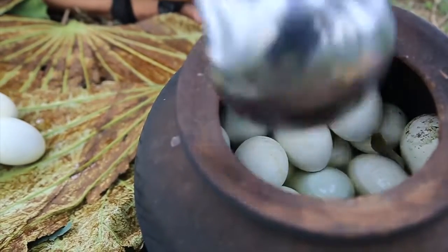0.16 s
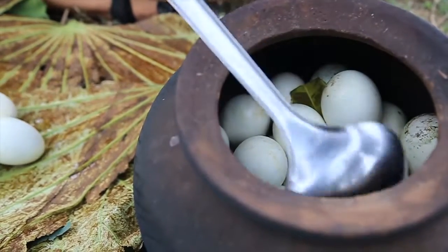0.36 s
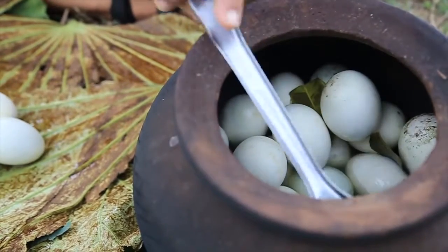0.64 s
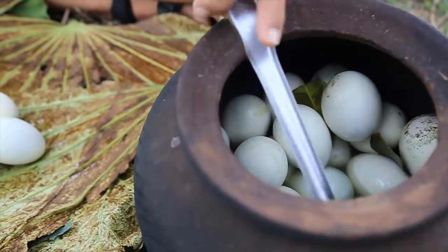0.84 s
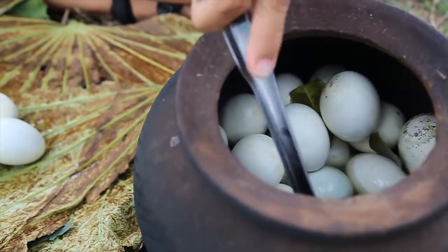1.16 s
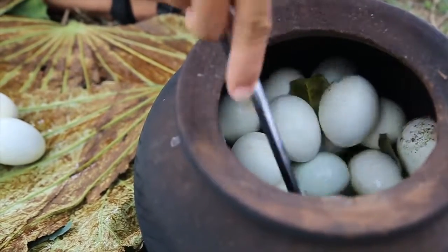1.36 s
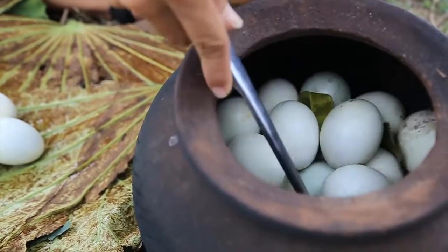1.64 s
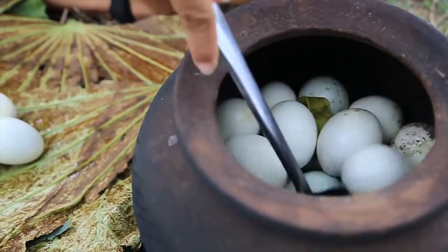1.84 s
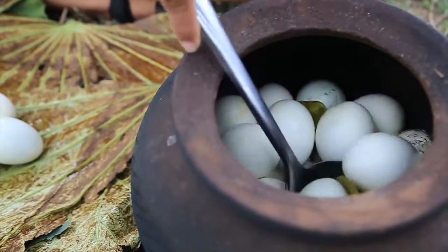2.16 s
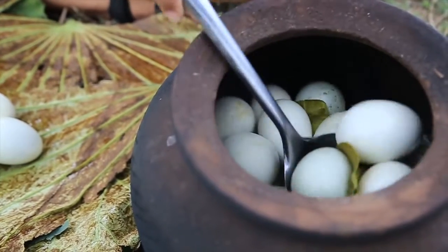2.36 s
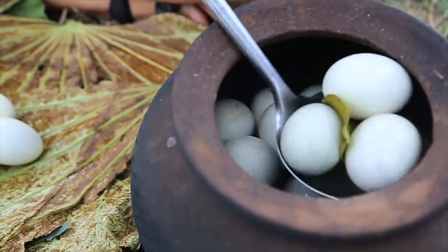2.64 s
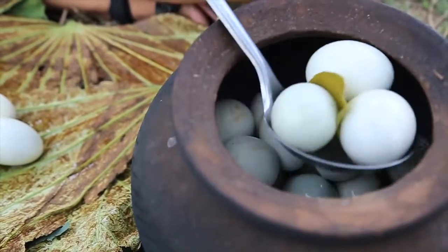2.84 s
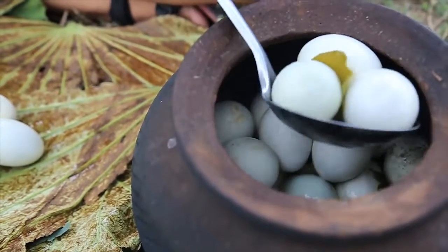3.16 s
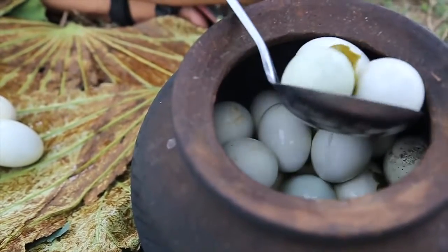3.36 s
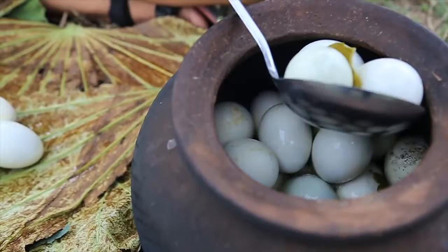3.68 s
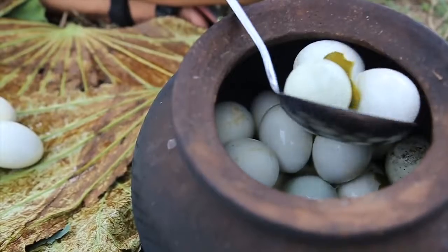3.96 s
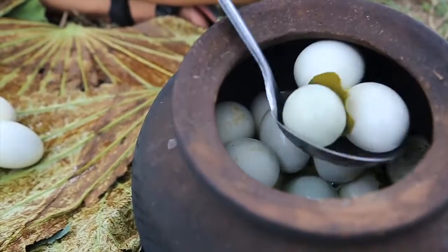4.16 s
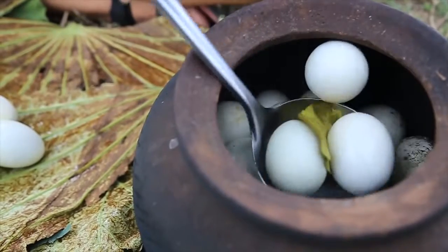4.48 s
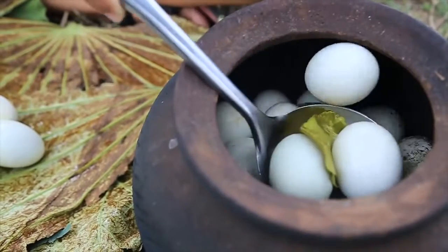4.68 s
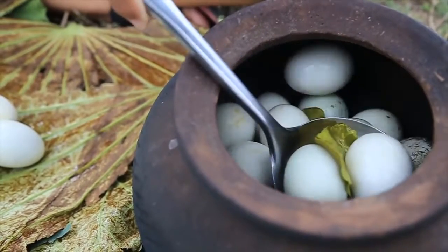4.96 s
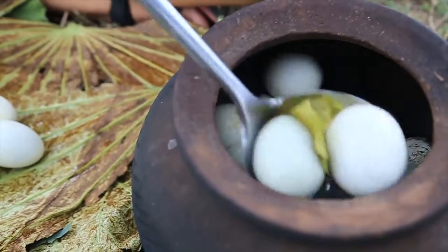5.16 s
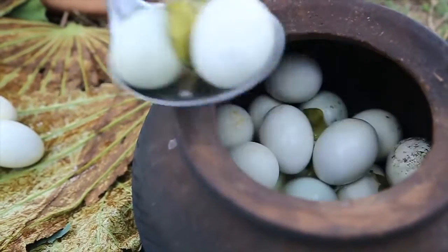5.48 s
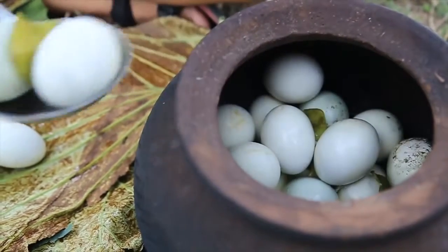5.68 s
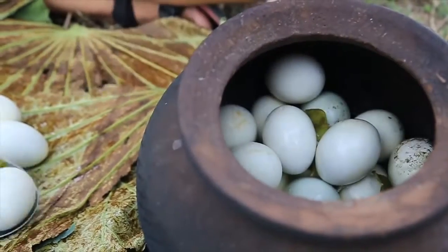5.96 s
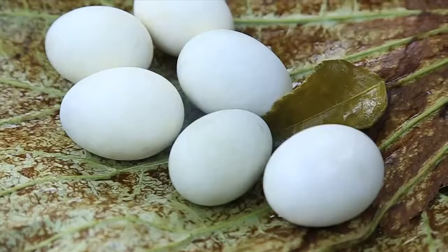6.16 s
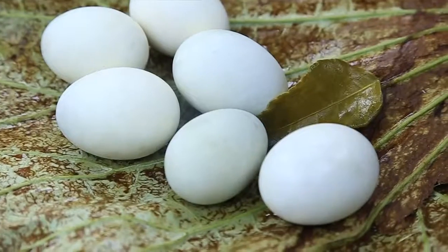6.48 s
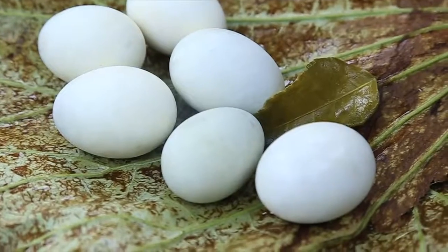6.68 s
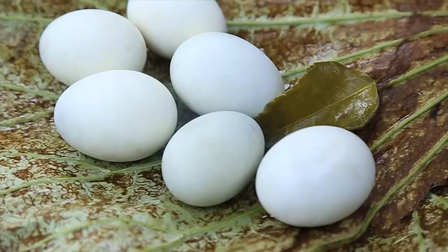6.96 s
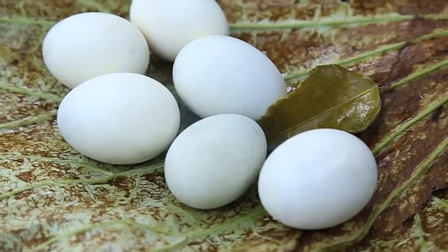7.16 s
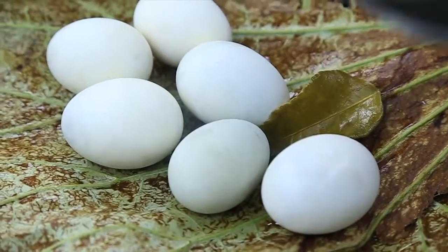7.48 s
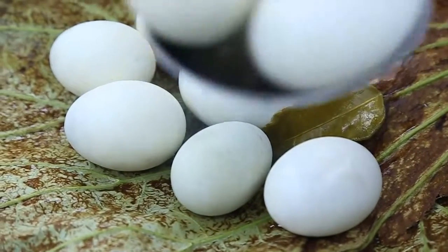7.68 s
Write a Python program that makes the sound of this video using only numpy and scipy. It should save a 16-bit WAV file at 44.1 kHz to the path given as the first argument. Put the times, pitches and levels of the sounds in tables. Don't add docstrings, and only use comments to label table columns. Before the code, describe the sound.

Low uneven wind buffeting runs nearly throughout, with a thin steady hiss. Near the microphone, a metal ladle clacks on thick clay and rattles among eggs: dry knocks, gritty scrapes, tiny squeaks and a hollow pot resonance. The hardest early blows come in the first two seconds, a quiet lift follows, then a tight burst of knocks around five seconds. After a momentary dropout, small taps and a squeak give way to wind.

```python
import sys
import numpy as np
from scipy import signal
from scipy.fft import rfft, irfft
from scipy.io import wavfile
from scipy.ndimage import uniform_filter1d

SR = 44100
rng = np.random.default_rng(int(sys.argv[2]) if len(sys.argv) > 2 else 0)


def invert_db(level):
    return 10 ** (np.asarray(level, dtype=float) / 20)


def master_out(mix):
    frames = np.transpose(np.atleast_2d(mix))
    ceiling = np.clip(frames, -1, 1)
    pcm = np.round(ceiling * 32767).astype(np.int16)
    wavfile.write(sys.argv[1], SR, pcm)


N = 345303


def band(x, low_hz, high_hz, order=2):
    return signal.sosfilt(signal.butter(order, [low_hz, high_hz], "band", fs=SR, output="sos"), x)


def rms_one(x):
    return x / np.sqrt(np.mean(x ** 2) + 1e-20)


def in_time(table):
    start_s, *columns = np.transpose(table)
    return [np.interp(np.arange(N) / SR, start_s, column) for column in columns]


def drift(rate_hz):
    r = np.exp(-80 * np.pi * rate_hz / SR)
    white = rng.standard_normal(N // 40 + 2002)
    slow = rms_one(signal.lfilter([1], [1, -2 * r, r * r], white)[2000:])
    return np.interp(np.arange(N) / 40, np.arange(len(slow)), slow)


def ring(x, hz, t60_s):
    r, w = invert_db(-60 / (t60_s * SR)), 2 * np.pi * hz / SR
    return signal.lfilter([0, np.sin(w)], [1, -2 * r * np.cos(w), r * r], x + 1e-18)


def evened(x, span_s, share):
    swell = uniform_filter1d(x ** 2, max(int(span_s * SR), 1)) + 1e-12
    return rms_one(x / swell ** (share / 2))


# peak_s, peak_db, dying_s
GUSTS = [(.03, -33.5, 1), (.81, -25.5, 0.069), (1.3, -26, 0.046), (1.74, -30, 0.015), (2.5, -29, 0.045),
         (2.722, -17, 0.019), (3.28, -31, 0.1), (3.55, -28.5, 0.061), (3.72, -18, 0.066),
         (4.05, -17, 0.029), (4.52, -25, 0.045), (5.13, -19.5, 0.032), (5.52, -29.5, 0.044),
         (5.73, -22, 0.26), (5.99, -38.5, 0.11), (6.31, -31, 0.016), (6.55, -35, 0.094),
         (7.32, -22.5, 0.094), (7.72, -31.5, 0.092)]


def gusts():
    t, rise_s = np.arange(N) / SR, 0.015
    return sum(invert_db(peak_db) * np.exp(np.minimum((t - s) / rise_s, (s - t) / dying_s))
               for s, peak_db, dying_s in GUSTS)


# start_s, strength_db, tilt_db (from slow buffeting to flutter)
WIND = [(0, -30, 12.5), (.36, -17.5, 1), (.48, -28.5, -9), (.9, -20, -1), (1.1, -27, -5.5), (1.55, -27, -5),
        (1.68, -15, 1), (2.9, -17.5, -1.5), (3.07, -24, -4), (3.76, -15, -0.5), (4.48, -12.5, -.5),
        (4.92, -18.5, -2.5), (5.42, -29.5, -10.5), (5.55, -19, -1), (6.2, -15.5, -2), (6.85, -21, -0.5),
        (7.39, -18, -0.5), (7.83, -14.5, 3)]


def wind():
    wind_db, tilt_db = in_time(WIND)
    white = rng.standard_normal((3, N + SR))
    slow = evened(band(white[0], 20.9, 58.5)[SR:], 0.13, 0.29)
    flutter = evened(band(white[1], 64.7, 114.2, order=3)[SR:], 0.088, 0.3)
    small = band(band(white[2], 146.6, 179.0, order=1), 115, 327)[SR:]
    small = evened(small, 0.039, 0.77) * invert_db(2.0 * drift(23))
    burst = gusts()
    slow_gain = invert_db(wind_db - 4.5 - tilt_db)
    flutter_gain = invert_db(wind_db - 8 + tilt_db) + invert_db(4.5) * burst
    small_gain = invert_db(wind_db + tilt_db - 22) + invert_db(-5.0) * burst
    return slow_gain * slow + flutter_gain * flutter + small_gain * small


# pitch_hz, level_db (per Hz)
HISS_COLOUR = [(150, -56), (250, -13.5), (600, -12), (2000, -16.5), (9300, -27), (10200, -31),
               (15600, -33.5), (16000, -61)]
# start_s, level_db
HISS_LEVEL = [(0.0, -39), (1.28, -40), (2.14, -38.5), (4.21, -40), (7.83, -44)]


def hiss():
    hz = np.fft.rfftfreq(N, 1 / SR)[1:]
    points = np.array(HISS_COLOUR)
    shape = invert_db(np.interp(np.log(hz), np.log(points[:, 0]), points[:, 1]))
    noise = rms_one(irfft(rfft(rng.standard_normal(N)) * np.append(0, shape), N))
    whine_hz, whine_db = 15661, -70
    whine_gain = invert_db(whine_db + 1.5 * drift(8)) * np.sqrt(2)
    whine = whine_gain * np.sin(2 * np.pi * whine_hz * np.arange(N) / SR + 0.8 * drift(5))
    return invert_db(in_time(HISS_LEVEL)[0] - 6.5 + 1.62 * drift(21.4)) * noise + whine


# pitch_hz, level_db, t60_s
POT_MODES = [(915, 4, 0.4), (1070, 1.5, 0.13), (1470, -24, 0.28), (1740, -2, 0.11), (2050, 4.5, 0.052),
             (2330, 15, 0.017), (2720, 11.5, 0.023), (3300, 2.5, 0.084), (3600, 1.5, 0.05),
             (4060, -2.5, 0.081), (5550, -30, .04)]


def walls(x, hz, damping, reach_db):
    return rms_one(sum(invert_db(db - reach_db * abs(np.log2(mode_hz / hz))) * ring(x, mode_hz, damping * t60_s)
                       for mode_hz, db, t60_s in POT_MODES))


def cavity(x, t60_s):
    full_hz, emptier_hz, lift_s = 376, 355.3, 2.7
    early = np.arange(N) < lift_s * SR
    return ring(x * early, full_hz, t60_s) + ring(x * ~early, emptier_hz, t60_s)


def blows(rows, sustain, wall_db, wide_db):
    out, low, bright = np.zeros(N), np.zeros(N), np.zeros((2, N))
    t = np.arange(2048) / SR
    rattle = np.tanh(1.03 * rng.standard_normal((len(rows), len(t))))
    snap_db, snap_t60_s = -2, 0.00098
    snap = invert_db(snap_db - 60 * t / snap_t60_s)
    for (s, peak_db, hz, crack_db, boom_db, t60_s), noise in zip(rows, rattle):
        t60_s = np.clip(t60_s, 0.003, 0.2)
        i = round(s * SR)
        part = slice(i, i + len(t))
        contact = noise * (invert_db(-60 * t / t60_s) + snap) * (1 - np.exp(-t / 0.00029))
        shell = rms_one(ring(contact, hz, sustain * t60_s))
        wide = rms_one(band(contact, 1130, 4200))
        body = shell + invert_db(wall_db) * walls(contact, hz, 0.57, reach_db=6.0) + invert_db(wide_db) * wide
        body = band(body, 450, max(4500, 6.3 * hz), order=1) * np.minimum(1, (t[-1] - t) / 0.04)
        out[part] += invert_db(peak_db) * body / np.abs(body).max()
        crack_gain = invert_db(peak_db + crack_db * np.array([[1], [1.2]]))
        bright[:, part] += crack_gain * contact / np.abs(contact).max()
        low[i] += invert_db(peak_db + boom_db)
    crack = invert_db(7.5) * band(bright[0], 2350, 8180) + invert_db(-0.5) * band(bright[1], 5400, 15500)
    thud = cavity(low, 0.099) + invert_db(1.0) * ring(low, 558, 0.012)
    return out + crack + invert_db(-4.0) * band(thud, 332, 1500)


# start_s, peak_db, pitch_hz, crack_db (re peak), contact_t60_s
CLACKS = [(0.458, -9.5, 1130, -34, 0.028), (0.697, -17.5, 810, -25, 0.0089), (0.98, -9.5, 2100, -7, 0.028),
          (1.018, -8.5, 2990, -8, 0.017), (1.168, -21, 1750, -15, 0.082), (1.244, -24, 1790, -16, 0.02),
          (1.351, -5, 2250, -20, 0.028), (2.026, -7, 2330, -10.5, 0.038), (2.205, -23, 2460, -9.5, 0.015),
          (2.983, -18.5, 1070, -15, 0.014), (3.396, -26.5, 2980, -25, 0.015), (3.65, -26, 965, -29, 0.069),
          (3.773, -22.5, 2420, -8, 0.021), (3.936, -24.5, 2180, -7, 0.019), (4.326, -21, 915, -15, 0.028),
          (5.172, -10.5, 830, -44, 0.016), (5.2, -19, 2050, -29, 0.014), (6.302, -25, 1900, -20, 0.012),
          (6.5576, -15, 1600, -14, 0.007), (6.608, -26, 2085, -18, 0.012)]


def clacks():
    rows = [(s, peak_db, hz, crack_db, -7.5 - 9.5 * np.log2(hz / 1000), t60_s)
            for s, peak_db, hz, crack_db, t60_s in CLACKS]
    return blows(rows, 1.76, wall_db=-3.0, wide_db=-6.5)


# start_s, blow_db, brightness_db (per octave)
CLINKS = [
    (0.459, -23.5, -0.5),
    (.484, -37.5, 3.5),
    (.67, -48, 8),
    (0.696, -31.5, 1),
]
# pitch_hz, level_db, t60_s
LADLE_MODES = [(1065, -24.5, 0.088), (1600, 1, 0.086), (1900, 4.5, 0.036), (2260, -1.5, 0.15),
               (4230, -13, 0.091), (5157, -9, 0.22), (5670, -14, .07), (7170, -12, .1), (8540, -8.5, .1),
               (9560, -14, .1), (10750, -17, .1), (12600, -9, 0.042), (14400, -12, .08), (15200, -20, .08)]


def clinks():
    out, at = np.zeros(N), [round(s * SR) for s, blow_db, tilt_db in CLINKS]
    strengths_db = rng.normal(0, 1.4, (len(CLINKS), len(LADLE_MODES)))
    for (hz, level_db, t60_s), own_db in zip(LADLE_MODES, strengths_db.T):
        clicks = np.zeros(N)
        struck_db = [blow_db + level_db + tilt_db * np.log2(hz / 3000) for s, blow_db, tilt_db in CLINKS]
        clicks[at] = invert_db(struck_db + own_db)
        out += ring(clicks, hz, min(t60_s, 0.3 if hz < 5400 else 0.08))
    return out


# start_s, pitch_hz, level_db, t60_s
RINGS = [(.486, 3623, -33, .6), (.466, 3623, -41, .15), (.98, 620, -27, .05), (.524, 1077, -33, .06),
         (.89, 960, -32, .15), (.89, 1510, -31, .12), (1.021, 1502, -28, .17), (.98, 1830, -9, .05),
         (.98, 1700, -16, .09), (.981, 2024, -20, .08), (.98, 5450, -22, .03), (1.018, 1725, -.5, .04),
         (1.0182, 1949, -9, .04), (1.018, 3526, -25, .05), (5.279, 1080, -15, .06), (5.288, 1061, -13, .07),
         (5.289, 684, -19, .1), (5.288, 1873, -17, .08), (6.5572, 2089, -16, .075), (.98, 372, -23, .1),
         (1.018, 366, -26, .2), (.982, 958, -31, .12), (2.41, 372, -27, .2), (5.341, 352, -11.5, .14),
         (1.527, 570, -19, .05), (6.607, 1050, -35, .12), (6.609, 3400, -41, .12), (6.607, 2085, -27, .1),
         (2.984, 560, -30, .04), (1.018, 2290, -14, .03), (1.168, 1450, -33, .25), (1.355, 915, -27.5, .22),
         (4.96, 2050, -34, .1), (4.96, 2700, -36, .08), (5.126, 942, -23, .09), (5.253, 960, -27, .11),
         (6.243, 1000, -34, .35), (6.5572, 2750, -19, .035), (6.563, 3600, -30, .02),
         (6.558, 1030, -24, .07), (6.557, 1520, -19, .035)]


def rings():
    out, t, touch = np.zeros(N), np.arange(SR // 3) / SR, drift(90)
    for s, hz, level_db, t60_s in RINGS:
        i = round(s * SR)
        tone = np.sin(2 * np.pi * hz * t) * (1 - np.exp(-t / 0.00056)) * invert_db(level_db - 60 * t / t60_s)
        own_touch = np.roll(touch, round(hz * 10))[i:][:len(t)]
        tone = tone * invert_db(4.5 * np.minimum(2 * t / t60_s, 1) * own_touch)
        out[i:i + len(t)] += tone * np.cos(np.pi / 2 * t / t[-1])
    return out


# pitch_hz, width_hz, level_db
GRIT_MODES = [(7200, 240, 10), (7800, 70, 14), (8870, 220, 24), (10600, 110, -14), (13000, 440, -32),
              (14000, 200, -13), (14500, 70, -8)]


def steel(x):
    peaks = sum(rms_one(ring(x, hz, 0.65 / width_hz)) * invert_db(db) for hz, width_hz, db in GRIT_MODES)
    return rms_one(band(x, 3000, 15800, order=1)) + invert_db(-9) * rms_one(peaks)


# start_s, length_s, rubbing_db, pitch_hz
ROLLS = [(0.473, 0.055, -43, 1120), (0.873, 0.025, -39, 1520), (1.374, 0.12, -45, 1740),
         (1.604, 0.11, -43.5, 1800), (1.869, 0.019, -39, 1190), (2.016, 0.031, -27, 2530),
         (2.199, 0.046, -46, 2270), (2.397, 0.082, -44, 960), (2.605, 0.054, -33.5, 1820),
         (4.325, 0.13, -48, 2030), (5.136, 0.05, -39, 2040), (5.198, 0.074, -43.5, 1930)]
# start_s, length_s, rubbing_db, pitch_hz, grit_db (re rubbing)
SCRAPES = [(0.585, 0.038, -44, 1500, -3.5), (0.964, 0.0049, -44, 1600, 9), (1.169, 0.065, -41, 2730, -4.5),
           (1.246, 0.085, -38, 2900, -4), (1.26, 0.053, -45, 3400, -18), (1.342, 0.009, -33, 2050, 0),
           (1.531, 0.018, -34, 1470, -14), (1.659, 0.079, -38, 2280, -9.5),
           (1.934, 0.051, -43.5, 2620, -5.5), (2.095, 0.015, -43.5, 2000, -4),
           (2.376, 0.03, -45, 3080, -13), (2.877, 0.078, -47.5, 2150, -6.5), (3.323, 0.079, -46.5, 3530, 3),
           (3.422, 0.076, -48.5, 3970, -11), (3.58, 0.069, -49.5, 3680, -0.5), (3.902, 0.095, -57, 2570, 6),
           (4.145, 0.14, -52, 3030, 3), (4.322, 0.2, -67, 3500, 6), (4.555, 0.049, -53, 3030, 4),
           (4.643, 0.055, -43.5, 1500, -6), (4.897, 0.036, -37, 1510, -17), (5.292, 0.034, -30, 2300, -5),
           (5.337, 0.023, -31.5, 2430, -13), (6.237, 0.04, -37.5, 2620, -3.5)]
# start_s, length_s, rubbing_db,
# pitch_hz, width_hz
SHELL_SLIDES = [(0.715, 0.05, -39.5, 1206, 50), (6.608, 0.035, -48, 1300, 900), (0.715, 0.06, -40, 1600, 550),
                (0.822, 0.064, -54, 3800, 900), (0.805, 0.1, -37.5, 2100, 570), (1.089, 0.036, -42.5, 2500, 900),
                (1.17, 0.025, -43, 2100, 70), (2.68, 0.071, -41.5, 1960, 200), (2.675, 0.1, -46, 2720, 180),
                (4.141, 0.16, -44, 2100, 400), (4.392, 0.12, -42, 2000, 300), (4.523, 0.093, -45.5, 2060, 300),
                (4.642, 0.09, -53, 14050, 400), (2.383, 0.038, -42.5, 1680, 150), (2.432, 0.045, -42, 780, 200),
                (4.36, .15, -53, 4300, 700), (4.16, .13, -60, 13000, 600), (4.93, 0.05, -61, 13000, 800),
                (5.281, 0.03, -33, 1120, 445), (6.288, 0.047, -47, 2050, 250), (6.562, 0.033, -41.5, 1700, 800)]


def strokes():
    squeals = [(*row, -17.5) for row in SHELL_SLIDES]
    scrapes = [(*row, 1300, grit_db) for *row, grit_db in SCRAPES]
    rolls = [(*row, 920, -14.5) for row in ROLLS]
    return squeals + scrapes + rolls


def slide():
    sizes = invert_db(3.2 * np.minimum(rng.exponential(1, (2, N)), 4)) * rng.choice([-1, 1], (2, N))
    grains_per_s = 2200
    grains = rms_one(sizes * (rng.random((2, N)) < grains_per_s / SR)) * invert_db(3 * drift(60))
    smooth = rng.standard_normal(N) * invert_db(drift(30.1))
    grit = rms_one(steel(grains[1]))
    boom = rms_one(cavity(band(grains[1], 200, 730), 0.071))
    wide = rms_one(band(grains[1], 600, 4300))
    out = np.zeros(N)
    for s, length_s, rub_db, hz, width_hz, grit_db in strokes():
        i, t = round(s * SR), np.arange(round(length_s * SR) + 2600) / SR
        part = slice(i, i + len(t))
        press = np.clip(t / 0.0057, 0, 1) * np.exp(-np.maximum(t - length_s, 0) / 0.0093)
        rough = np.clip(width_hz / 900, 0.1, 1)
        drag = np.sqrt(rough) * grains[0, part] + (1 - np.sqrt(rough)) * smooth[part]
        bowl = ring(drag, hz, 2.2 / width_hz)
        bowl = rms_one(ring(bowl, hz, 2.2 / (2 * width_hz + 300)))
        wall = walls(drag, hz, 2.6, reach_db=1.0)
        pot = invert_db(-8.0) * np.sqrt(rough) * wall + rough * (invert_db(-7.5) * wide[part] + invert_db(-4.5) * boom[part])
        body = bowl + min(1, (4000 / hz) ** 2) * pot
        out[part] += invert_db(rub_db) * press * (body + invert_db(grit_db) * grit[part])
    return out


# start_s, peak_db, pitch_hz, crack_db (re peak), boom_db (re peak)
KNOCKS = [(0.483, -16.5, 1140, -9, -23), (0.67, -25, 1900, -10, -19), (0.886, -17, 1850, 0, -2),
          (1.419, -29, 923, -4, -33), (1.515, -25, 794, -20, -8), (1.527, -15, 1870, -6, 1),
          (1.547, -16, 780, -26, 3), (1.67, -12.5, 760, -20, -14), (2.442, -31, 751, -26, 13),
          (2.635, -13.5, 1770, -46, -2), (2.677, -13.5, 1070, -8, -15), (4.152, -27, 2600, -6, -25),
          (4.457, -24, 2000, -9, -25), (4.644, -28, 1500, -7, -33), (4.876, -13.5, 1780, -11.5, 2.5),
          (4.898, -9, 3470, -9.5, -2), (5.124, -9, 1950, -21, -16), (5.265, -27, 1040, -19, 9),
          (5.278, -15.5, 1100, -18, -4), (5.288, -7.5, 1010, -11.5, -2), (5.305, -9, 800, -14, -3),
          (5.337, -11, 2640, -15, -20), (6.272, -28, 2900, 2.5, -26)]


def knocks():
    return blows([(*row, 0.033) for row in KNOCKS], 0.05, wall_db=-7.0, wide_db=-4.0)


# start_s, peak_db, pitch_hz
TICKS = [(0.613, -35, 4200), (1.416, -21, 4400), (1.602, -29, 3600), (1.654, -27, 3220),
         (3.371, -23.5, 3220), (3.44, -28.5, 3500), (3.547, -36, 3160), (3.6158, -30.5, 4130),
         (3.742, -29, 3600), (3.9823, -31, 3800), (4.29, -33, 3410), (4.3677, -35, 4330),
         (4.437, -30, 3440), (4.506, -29, 4800), (4.5658, -32, 4240), (4.6017, -32, 4350),
         (4.661, -25, 14000), (4.814, -30.5, 6240), (6.5714, -23.5, 7630)]


def ticks():
    out, t = np.zeros(N), np.arange(600) / SR
    for (s, peak_db, hz), noise in zip(TICKS, rng.standard_normal((len(TICKS), len(t)))):
        i = round(s * SR)
        burst = noise * invert_db(-60 * t / 0.021)
        bright = rms_one(band(burst, 3000, 8400, order=1))
        burst = rms_one(ring(burst, hz, 18.0 / hz)) + invert_db(1.0) * bright
        out[i:i + len(t)] += invert_db(peak_db) * burst / np.abs(burst).max()
    return out


# start_s, length_s, peak_db, first_hz, last_hz
SQUEAKS = [(.79, .092, -26, 1700, 1780), (.8, .085, -51, 5180, 5220), (.85, .045, -41, 5600, 5450),
           (.79, .09, -44, 1950, 2300), (.705, .075, -40, 1900, 1900), (1.09, .045, -39, 1750, 1900),
           (1.1, .04, -43, 1480, 1480), (1.19, .05, -31, 1750, 1880), (1.243, .04, -31, 1750, 1950),
           (1.185, .03, -43, 3950, 4150), (1.2, .035, -45, 3000, 3300), (1.25, .035, -42, 3950, 4150),
           (1.262, .05, -42, 2900, 3200), (1.3, .022, -40, 4050, 4300), (1.293, .032, -32, 1780, 1800),
           (1.243, .09, -40, 1450, 1480), (1.325, .028, -33, 1850, 2150), (2.72, .045, -38, 2700, 2700),
           (2.685, .11, -43, 1950, 1960), (2.876, .045, -39, 1960, 1950), (4.645, .045, -44, 2000, 2040),
           (4.16, .045, -45, 1100, 1110), (4.645, .045, -46, 1480, 1500), (4.17, .1, -45, 2100, 2000),
           (4.345, .045, -40, 1950, 1750), (4.395, .07, -41, 2100, 1800), (4.455, .03, -38, 2050, 2000),
           (4.4, .06, -46, 1250, 1300), (4.9, .035, -36, 1480, 1480), (6.255, .025, -37, 1900, 2100),
           (6.626, .021, -27, 2085, 2085), (6.603, .043, -38, 2720, 2720), (6.572, .022, -41, 2750, 2720),
           (.752, .04, -38, 1600, 1680)]


def squeaks():
    out, wobble, flutter = np.zeros(N), drift(120), drift(110)
    swell_db, wobble_hz, flutter_db = 6.0, 24.0, 4.5
    for k, (s, length_s, peak_db, first_hz, last_hz) in enumerate(SQUEAKS):
        i, u = round(s * SR), np.arange(round(length_s * SR)) / (length_s * SR)
        own = slice(k * 9000, k * 9000 + len(u))
        hz = first_hz + (last_hz - first_hz) * u + wobble_hz * wobble[own]
        edge = np.clip(np.minimum(u, 1 - u) * length_s / 0.004, 0, 1)
        gain = invert_db(peak_db - swell_db * (1 - u) + flutter_db * np.clip(flutter[own], -2, 1))
        out[i:i + len(u)] += gain * edge * np.sin(2 * np.pi * np.cumsum(hz) / SR)
    return out


# start_s, peak_db, pitch_hz, crack_db (re peak)
TAPS = [(1.204, -22, 1770, -25), (1.276, -23, 2000, -10), (1.308, -22, 2500, -7), (1.397, -26, 1750, -20),
        (1.46, -24.5, 790, -30), (1.666, -14, 2300, -10), (1.694, -29, 2500, -20), (1.712, -29, 2300, -25),
        (1.743, -31, 2300, -25), (1.875, -32, 1800, -26), (2.384, -26, 3020, -23), (2.409, -23, 600, -30),
        (2.451, -29, 2000, -25), (2.478, -33, 1750, -30), (2.562, -41, 1900, -30), (2.731, -28, 1500, -32),
        (4.2436, -35, 1960, -22), (4.29, -33, 1050, -25), (4.353, -29, 1810, -25), (4.398, -32, 1200, -18),
        (4.438, -24, 1850, -20), (4.4935, -27, 1960, -25), (4.52, -29, 2050, -20), (4.5643, -34, 1860, -15),
        (4.6018, -35, 1950, -15), (4.66, -30, 2850, -17.5), (5.159, -29, 1900, -30), (5.23, -27, 1850, -30),
        (5.2798, -16, 2550, -24), (5.294, -10, 1000, -20), (5.301, -12.5, 890, -24),
        (5.32, -13, 2300, -9.5), (5.34, -12, 2680, -18), (5.39, -33, 2300, -30), (5.403, -47, 2200, -30),
        (6.254, -29, 2000, -12), (6.587, -28.5, 2750, -23), (6.672, -37, 2080, -4), (5.342, -17, 620, -30),
        (2.608, -26, 1800, -20), (2.92, -32, 1360, -30)]


def taps():
    return blows([(*row, -23.5, 0.012) for row in TAPS], 1.0, wall_db=-7.0, wide_db=-17.0)


# start_s, peak_db, pitch_hz
NUDGES = [(1.439, -25, 1800), (1.613, -26.5, 1430), (1.85, -26, 3300), (1.886, -37, 910),
          (2.003, -23.5, 2330), (2.053, -16, 1460), (2.144, -21, 650), (2.384, -35, 1650),
          (2.624, -21, 1850), (2.879, -26.5, 2030), (5.064, -29.5, 2500), (5.25, -24, 931),
          (6.14, -23.5, 1740)]


def nudges():
    return blows([(*row, -39, -8, 0.033) for row in NUDGES], 0.05, wall_db=-7.0, wide_db=-4.0)


def scene():
    air = wind() + hiss()
    struck = clacks() + clinks() + rings() + knocks() + ticks() + taps() + nudges()
    rubbed = slide() + squeaks()
    return (air + struck + rubbed)[None]


def roll_off(x):
    return signal.sosfilt(signal.butter(12, 16500, fs=SR, output="sos"), x)


def record(dry):
    x = signal.sosfilt(signal.cheby2(14, 40, 16200, fs=SR, output="sos"), dry)
    t = np.arange(N) / SR
    silent_s, resume_s, fade_s = 6.1612, 6.2385, 0.004
    gate = np.where(t < silent_s, 1, np.clip((t - resume_s) / fade_s, 0, 1))
    return roll_off(np.clip(x, -1, 1) * gate)


dry = scene()
out = record(dry)
master_out(out)
```